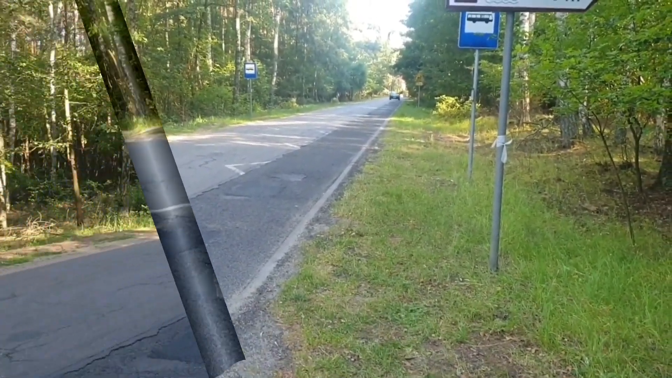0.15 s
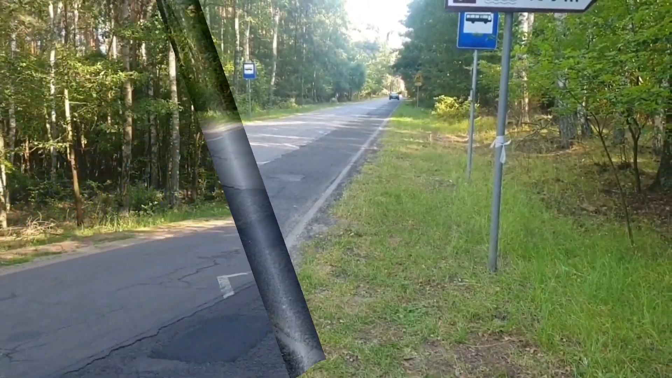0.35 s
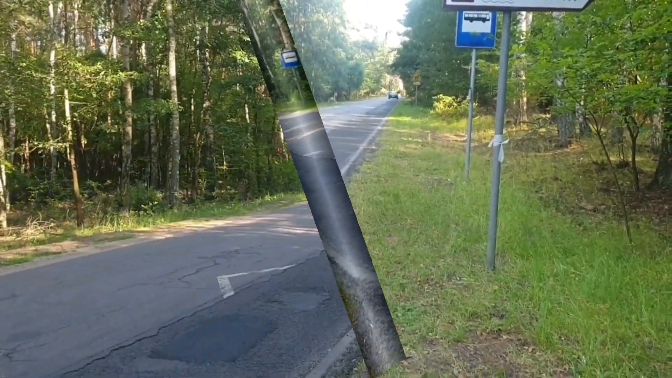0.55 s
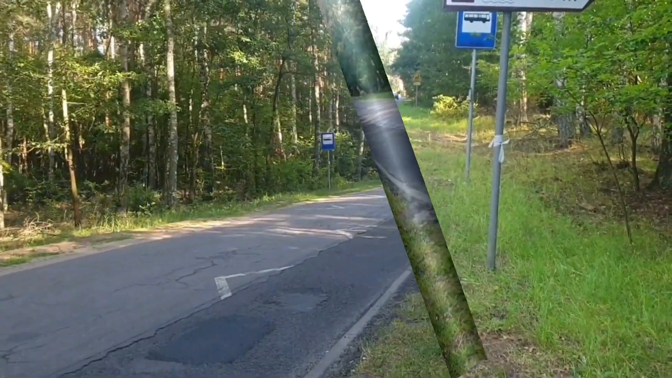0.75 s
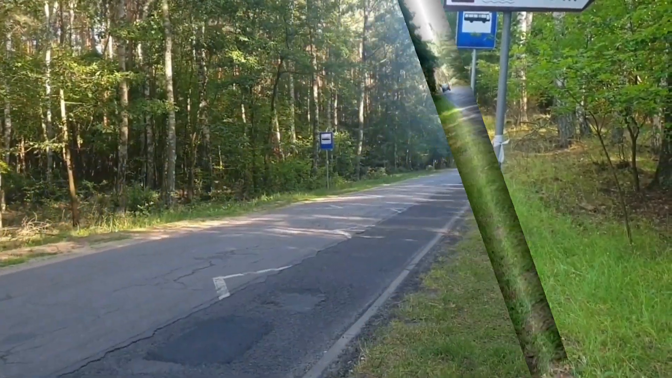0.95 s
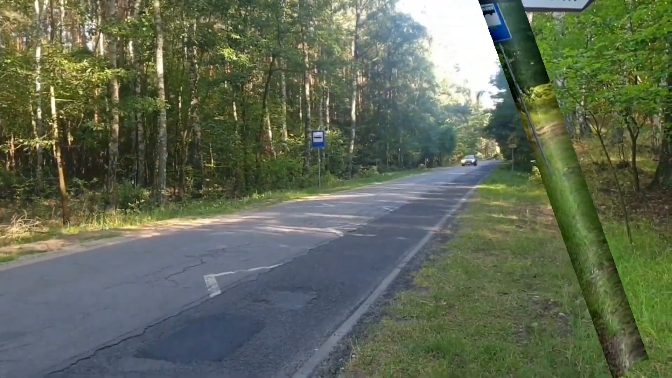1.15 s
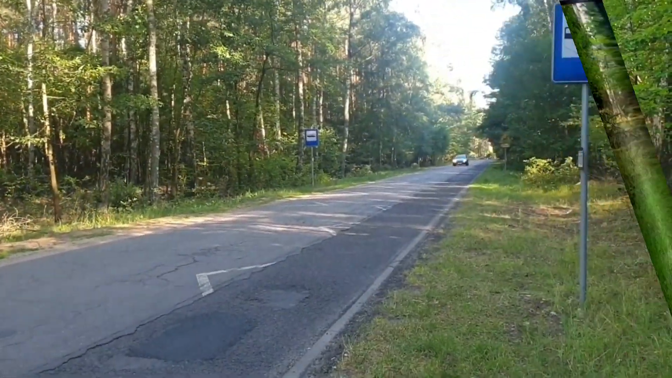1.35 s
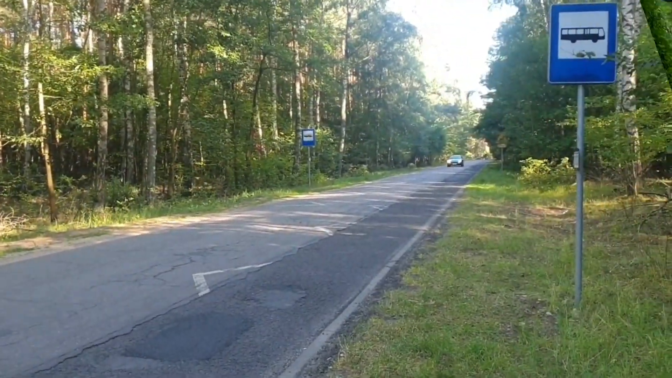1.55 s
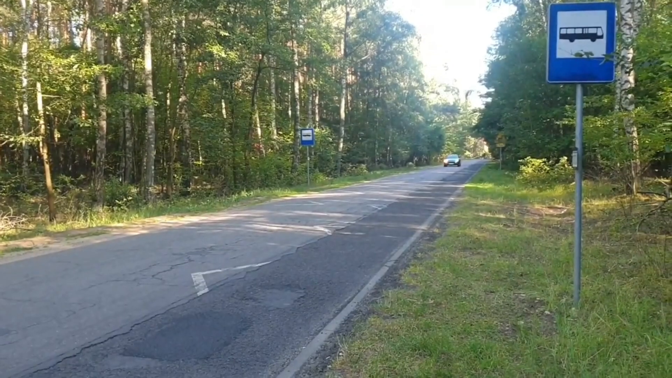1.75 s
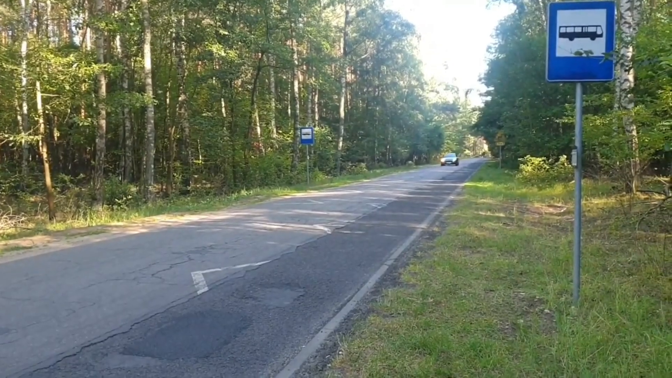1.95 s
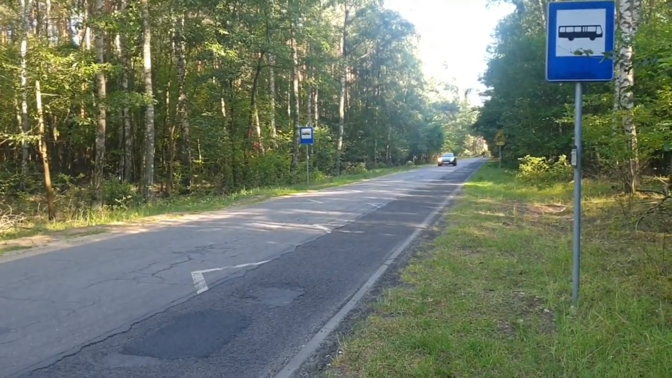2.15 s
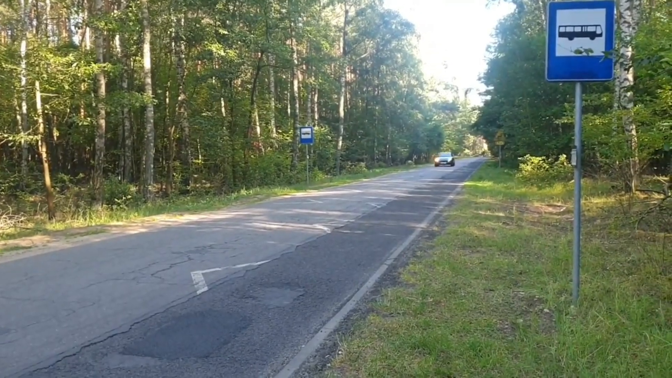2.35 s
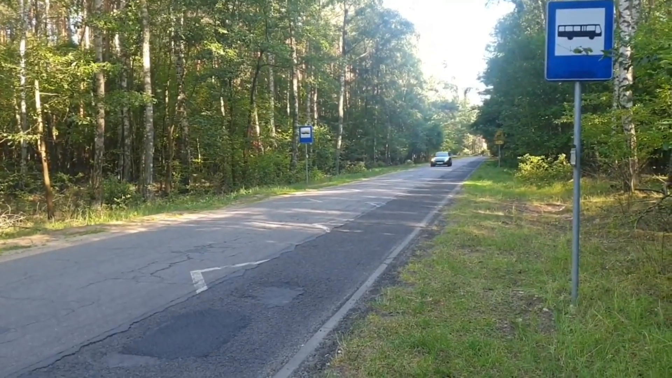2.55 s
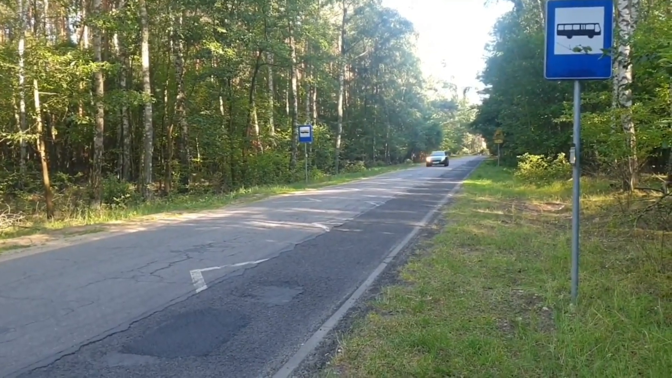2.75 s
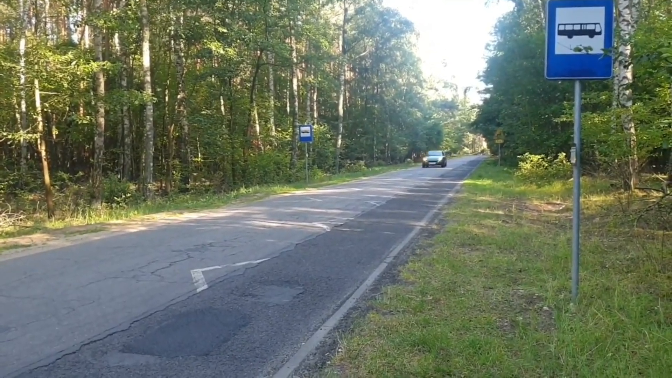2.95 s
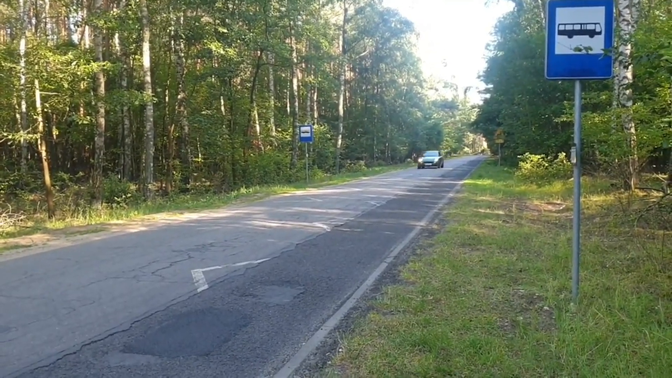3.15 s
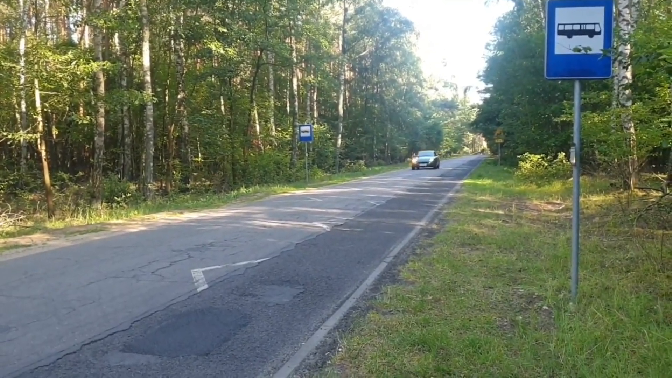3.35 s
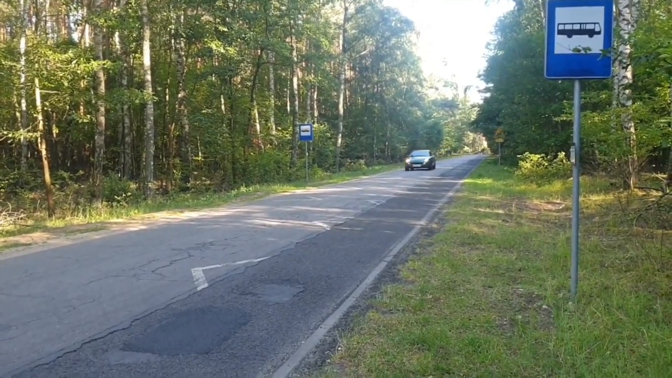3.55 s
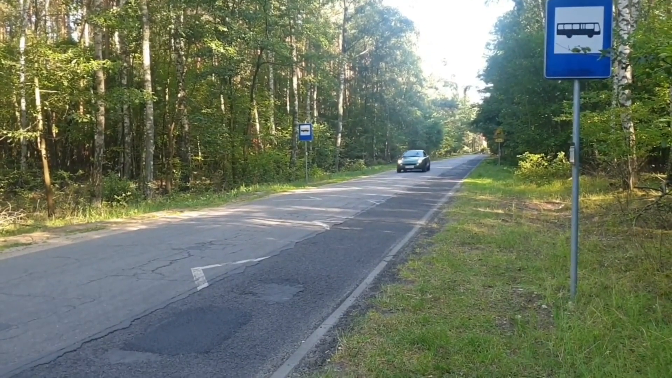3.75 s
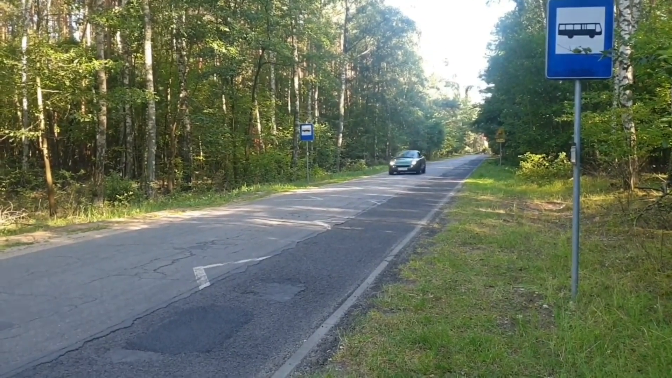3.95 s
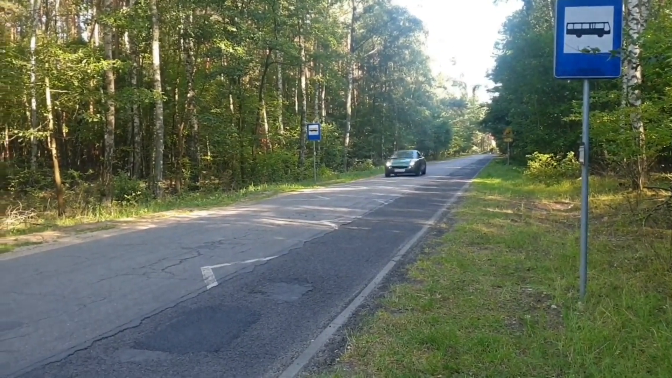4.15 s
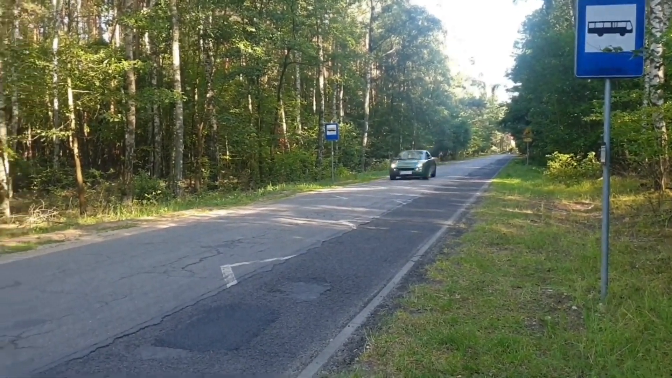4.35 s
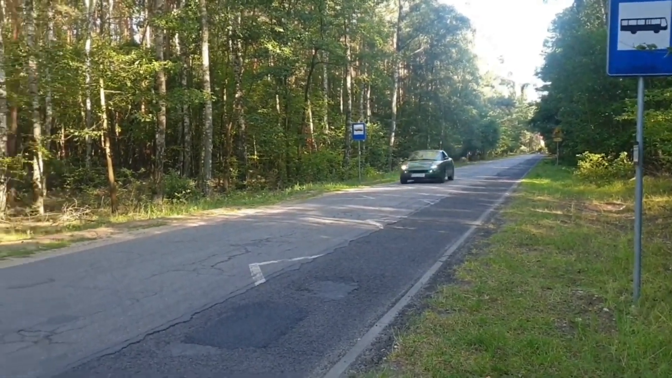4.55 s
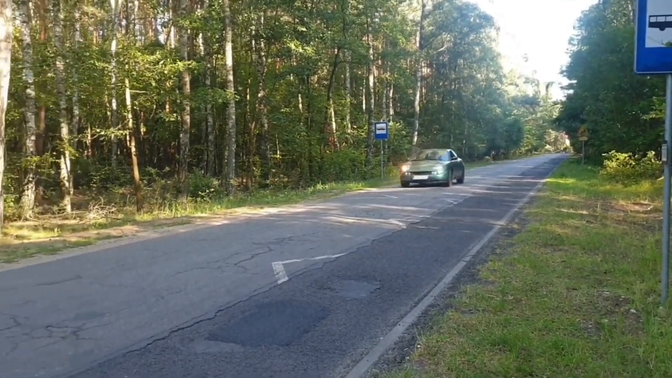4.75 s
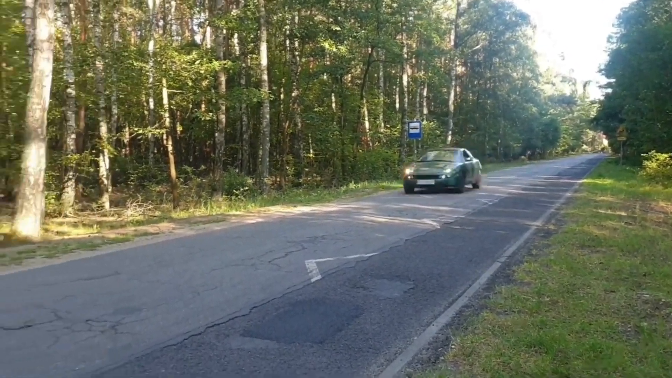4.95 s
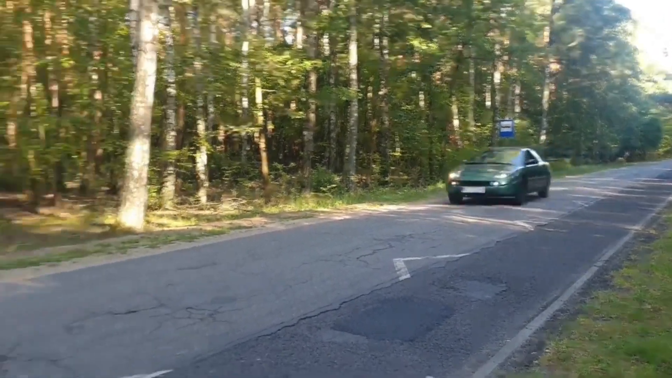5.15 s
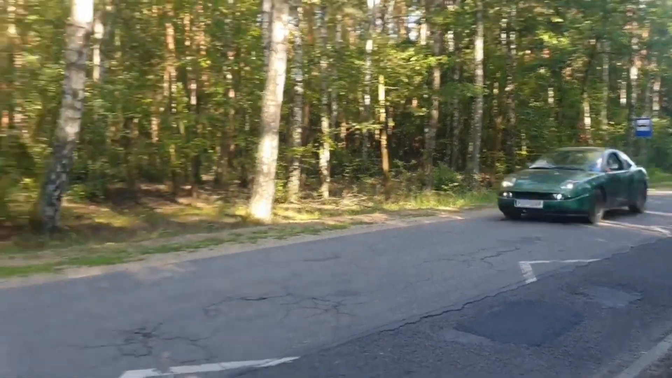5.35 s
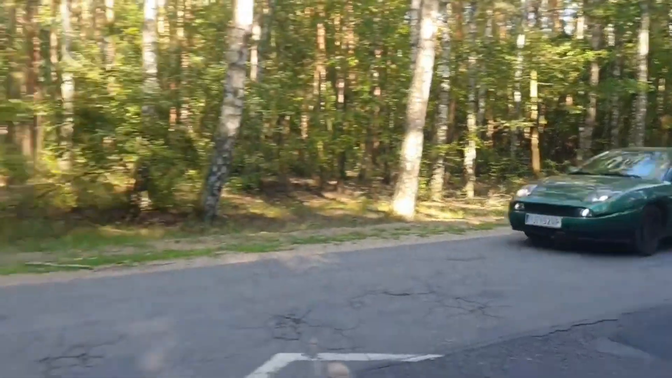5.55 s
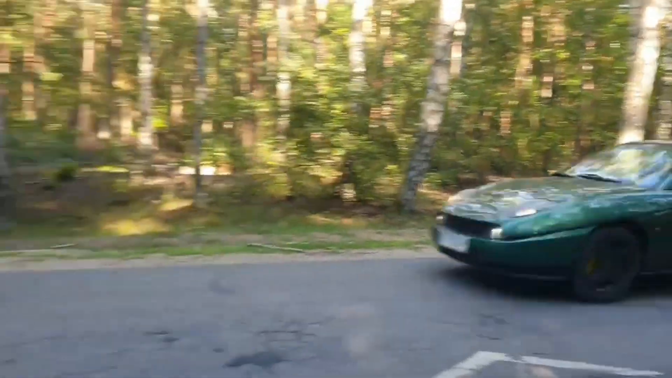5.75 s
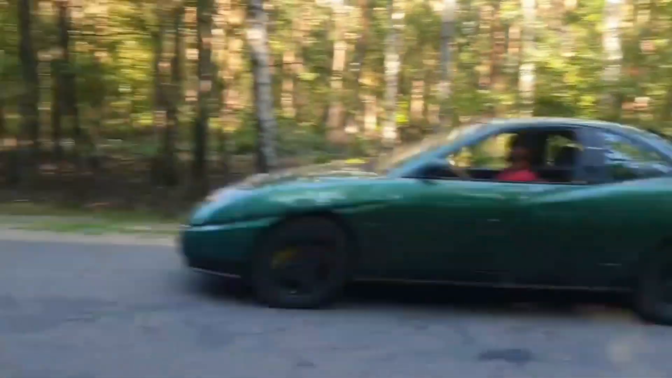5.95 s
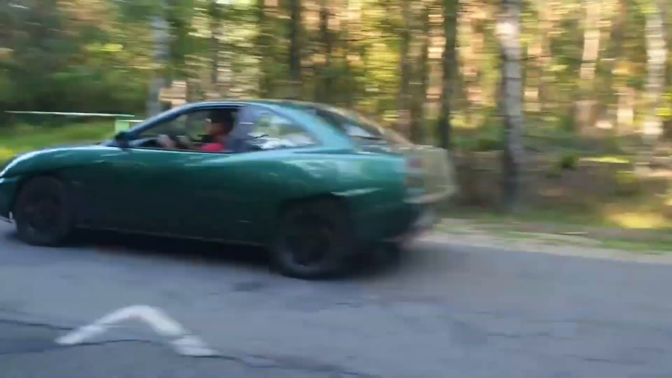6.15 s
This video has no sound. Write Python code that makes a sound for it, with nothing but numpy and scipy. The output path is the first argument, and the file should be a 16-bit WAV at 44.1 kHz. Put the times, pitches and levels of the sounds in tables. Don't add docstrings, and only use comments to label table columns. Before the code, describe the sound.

A receding car hums faintly and vanishes, followed by near silence and a short clicky glitch. Then low wind buffeting and a far car's steady drone appear, with tyre roar gradually brightening and a thin whine inside it. One tiny stone tick sounds. Late on, the engine accelerates hard, raspy and barking, loudest right beside the small stereo microphone at the end.

```python
import sys
import numpy as np
from scipy import signal
from scipy.io import wavfile
from scipy.ndimage import uniform_filter1d

SR = 44100
rng = np.random.default_rng(int(sys.argv[2]) if len(sys.argv) > 2 else 0)


def convert_level_to_amplitude(level_db):
    exponent = np.asarray(level_db, float) / 20
    return 10 ** exponent


def to_wav(sig):
    pcm = np.clip(np.atleast_2d(sig), -1, 1) * 32767
    pcm = np.round(pcm).astype(np.int16)
    wavfile.write(sys.argv[1], SR, pcm.T)


N = 273861
T = np.arange(N) / SR
FRAME_S = np.arange(N // 256 + 5) * 256 / SR
HZ = np.fft.rfftfreq(1024, 1 / SR)[:, None]
OPEN_S = 4.58


def read(points, hz=HZ):
    f, value = np.transpose(points)
    return np.interp(np.log(hz + 1), np.log(f + 1), value)


def curves(rows, t):
    s, *columns = np.transpose(rows)
    return [np.interp(t, s, c) for c in columns]


def bumps(rows, t):
    return sum(db * np.clip(1 - abs(t - s) / half, 0, 1) for s, db, half in rows)


def drift(rate_hz):
    f, phase = np.geomspace(rate_hz / 12, rate_hz, num=16), rng.random(16)
    coarse = np.sin(2 * np.pi * (f * FRAME_S[:, None] + phase)) @ f ** -.5
    return np.interp(T, FRAME_S, coarse / coarse.std())


def noise(shape_db, level_db, lo_hz, hi_hz, same, tilt_db, lag, patchy_db):
    a, b, c, d, patches = rng.standard_normal((len(level_db), 513, 5)).T
    patches = uniform_filter1d(uniform_filter1d(patches, size=10, axis=0), size=12, axis=1)
    shape = convert_level_to_amplitude(shape_db + 0 * level_db)
    band = (HZ[:, 0] > lo_hz) & (HZ[:, 0] < hi_hz)
    shape = shape / np.sqrt((shape[band] ** 2).sum(0))
    shape = shape * convert_level_to_amplitude(level_db + patchy_db * patches / patches.std())
    same = np.clip(same, 0, 1)
    right = a + 1j * b
    left = (same * right + np.sqrt(1 - same ** 2) * (c + 1j * d)) * np.exp(-1j * lag)
    z = np.array([left * convert_level_to_amplitude(tilt_db / 2), right * convert_level_to_amplitude(-tilt_db / 2)]) * shape
    sound = signal.istft(z, nperseg=1024, noverlap=768)[1][:, :N] * 0.9
    return np.pad(sound, ((0, 0), (0, N - sound.shape[1])))


def tone(turns, db, waver_db, lag_turns=0):
    size = np.sqrt(2) * convert_level_to_amplitude(db + waver_db * drift(14.))
    phase = turns + rng.random()
    return size * np.sin(2 * np.pi * np.array([phase - lag_turns, phase])) * convert_level_to_amplitude([[.6], [-.6]])


# frequency in Hz, level in dB.
LEAVING_COLOUR = [(88, -38), (150, -14), (166, -2.5), (255, -8), (283, -12), (405, -13.5), (581, -26.5),
                  (891, -12.5), (1300, -11), (1620, -21), (2100, -16.5), (2380, -24), (2600, -29),
                  (3000, -26), (3280, -32), (4770, -31.5), (6390, -51), (9000, -60), (11700, -98),
                  (19800, -120)]
# frequency in Hz, left over right in dB.
LEAVING_LEAN = [(60, 1.5), (120, 1.5), (240, 1.0), (470, 0.5), (940, 3.6), (1870, 9.1), (3730, 2.5),
                (7410, 3.5), (14800, 0.5)]
# frequency in Hz, likeness 0-1.
LEAVING_LIKENESS = [(60, 0.86), (150, 0.99), (380, 0.93), (940, 0.88), (2350, 0.32), (5890, 0.26),
                    (14800, 0.15)]
# time in seconds, change in dB, half length in seconds.
LEAVING_FLUTTER = [
    (.03, -1, 0.055),
    (.19, 1, 0.042),
    (.3, 7, .04),
    (.33, -4, 0.024),
    (.47, 6, 0.033),
]
# time in seconds, change in dB, half length in seconds.
LEAVING_AIR = [
    (.45, 11, .12),
]
# frequency in Hz, level in dB.
AIR_COLOUR = [(25, -36), (36, -14), (50, 3), (75, -8), (110, 0), (160, -24.5), (260, -26), (500, -78),
              (9000, -110)]
# frequency in Hz, level in dB.
HISS_COLOUR = [(6000, -20), (8500, -5), (10500, 0), (13500, -1), (14400, -1.5), (15300, -6)]


def leaving():
    tone_level_db, roar_level_db, faded_s = -47.5, -54.5, 0.75
    fade_db = 20 * np.log10(np.clip(1 - T / faded_s, .001, 1))
    first_db = tone_level_db + fade_db + bumps(LEAVING_FLUTTER, T)
    lower_db = -51 + fade_db - 8 * np.clip((T - .25) / .06, 0, 1)
    turns = 127 * T
    tones = tone(turns, first_db, 0.53)
    tones += tone(.75 * turns, lower_db, 3.5)
    tones += tone(1.96 * turns, tone_level_db + fade_db - 15.5, 1.4)

    frames = FRAME_S[:len(FRAME_S) // 8]
    frame_fade_db = np.interp(frames, T, fade_db)
    roar_db = roar_level_db + frame_fade_db
    duller = (HZ / 1000) ** 2 * frames * 0.86
    roar = noise(read(LEAVING_COLOUR) - duller, roar_db + 3.5, 700, 3000,
                 read(LEAVING_LIKENESS), read(LEAVING_LEAN), 0, 0.48)
    low_db = roar_db - 3 + bumps(LEAVING_AIR, frames)
    low = noise(read(AIR_COLOUR), low_db, 25, 95, .97, 0, 0, 1.1)
    hiss = noise(read(HISS_COLOUR), frame_fade_db - 94, 9000, 12800, .3, 0, 0, 2.)
    return tones + roar + low + hiss


# time in seconds, tyre roar in dB, left port lag in ms, nearness from 0 up,
# echo notch in Hz.
APPROACH = [(.7, -44, 0.0011, .01, 980), (1.3, -42, .001, 0.013, 934), (2.4, -39, .0012, 0.15, 910),
            (3, -36.5, .001, 0.098, 868), (4, -34, 0.00091, 0.4, 945), (4.7, -31.5, 0.003, 0.58, 980),
            (5, -31.5, 0.01, 0.66, 970), (5.2, -32, 0.0087, 0.84, 1010), (5.4, -30, 0.08, 0.73, 1053),
            (5.8, -28, 0.12, 0.82, 1097), (5.93, -29, 0.11, 1.2, 1100), (6, -25.5, 0.088, 1.75, 1160),
            (6.13, -25.5, 0.18, 1.8, 1260), (6.21, -27, 0.14, 2.6, 1260)]
# frequency in Hz, level in dB per Hz.
FAR_COLOUR = [(200, -61), (340, -9.5), (599, -5), (632, -16), (704, 0.5), (753, -1.5), (897, -3.5),
              (1040, 1), (1500, -1), (1670, -1), (2000, -4), (2330, -4.5), (2750, -8), (3100, -12.5),
              (3940, -14), (4890, -25), (8500, -42), (11000, -41.5), (18700, -120)]
NEAR_COLOUR = [(250, -20.5), (420, 2.5), (477, -7.5), (617, -7), (954, -5), (1070, -5), (1250, -9),
               (1740, -9.5), (2220, -13), (3270, -19.5), (4060, -19), (4620, -25), (9000, -43),
               (11700, -41.5), (19800, -120)]
ABREAST_COLOUR = [(250, -27), (420, -22), (484, -20), (711, -7.5), (872, -14), (954, -9.5), (1310, -14),
                  (1550, -10), (1860, -17.5), (2310, -10), (2660, -16), (2950, -12), (3300, -17),
                  (3620, -15.5), (4300, -21.5), (4800, -28.5), (6500, -33.5), (9000, -41), (11700, -54),
                  (19800, -120)]
# frequency in Hz, level in dB.
RUMBLE_COLOUR = [(30, -17.5), (48, 5), (70, -10), (110, 13), (200, 7), (290, 12), (350, -60), (700, -33.5),
                 (7000, -39), (9500, -87)]
# frequency in Hz, likeness 0-1.
PORT_LIKENESS = [(100, .99), (500, .96), (1000, .88), (1500, .8), (2300, .87), (3300, .55), (4300, .7),
                 (6000, .5), (10000, .25)]
# frequency in Hz, lag in radians.
PORT_LAG = [(100, .05), (700, 0.53), (1500, 0.92), (2500, 0.54), (3600, 1.28), (4200, 0.29), (6000, 1.07),
            (9000, 2)]
# frequency in Hz, left over right in dB.
LEAN_FAR = [(100, -2), (700, 2), (1200, -0.5), (1900, -4.5), (2600, -3), (3300, 2.5), (3900, -11.5),
            (4400, -1), (5200, 3.5), (6500, 7), (9000, 8)]
LEAN_NEAR = [(100, 16), (700, -1), (1200, 2), (1900, -11), (2300, -7.5), (3200, -3.5), (3900, 0),
             (4800, -2), (6500, 6), (9000, 7)]
# frequency when far in Hz, readiness to slide 0-1, share of the depth.
ECHO_NOTCHES = [(414, 1, .8), (920, 1, 1), (1518, 1, 1), (2500, .2, .7), (3150, .22, .7)]
# time in seconds, centre in Hz, half width in Hz, depth in dB.
HISS_VALLEY = [(.7, 11000, 1200, 3), (2, 10600, 1000, 7), (2.78, 10000, 600, 4), (3, 10800, 1100, 9),
               (3.4, 10600, 1200, 4), (3.7, 10900, 1100, 14), (4, 11000, 1100, 20), (4.2, 11700, 700, 20),
               (4.6, 11700, 400, 18), (4.8, 11400, 300, 12), (5.05, 11000, 550, 21), (5.2, 11500, 400, 18),
               (5.25, 11500, 400, 0), (5.35, 9500, 700, 0), (5.44, 9500, 800, 9), (5.48, 9500, 700, 2),
               (5.54, 9600, 700, 14), (5.62, 9700, 400, 3), (5.77, 9500, 800, 12), (5.85, 9900, 400, 10),
               (5.95, 9000, 400, 9), (6.02, 9000, 400, 2), (6.12, 9400, 400, 10), (6.21, 9300, 500, 2)]
# time in seconds, change in dB, half length in seconds.
LEAF_RUSTLE = [
    (2.78, 11, 0.074),
]


def road():
    roar_db, lag_ms, near, notch_hz = curves(APPROACH, FRAME_S)
    first, second = np.clip(near, 0, 1), np.clip(near - 1, 0, 1)
    colour = (1 - first) * read(FAR_COLOUR) + (first - second) * read(NEAR_COLOUR)
    colour = colour + second * read(ABREAST_COLOUR)
    depth_db = np.interp(near, [0, 1, 2], [5, 14, 5])
    width_hz = 36 + near / 60 * np.array([[f] for f, _, _ in ECHO_NOTCHES])
    for (f, slide, share), width in zip(ECHO_NOTCHES, width_hz * 0 + 1):
        centre_hz = f * (notch_hz / 920) ** slide
        width = 36 + f / 60 * near
        colour = colour - 1.4 * share * depth_db / (1 + ((HZ - centre_hz) / width) ** 2)
    valley_hz, valley_width, valley_depth_db = curves(HISS_VALLEY, FRAME_S)
    valley_db = valley_depth_db * np.exp(-((HZ - valley_hz) / valley_width) ** 4)
    colour = colour - valley_db

    turned = np.clip(lag_ms / 0.21, 0, 1)
    lean = (1 - turned) * read(LEAN_FAR) + turned * read(LEAN_NEAR)
    same = read(PORT_LIKENESS) ** (1 + 1.6 * turned * np.clip(HZ / 1200, 0, 1) ** 2)
    lag = read(PORT_LAG) + 2 * np.pi * HZ * lag_ms / 1000
    roar = noise(colour, roar_db + 3.5, 500, 4500, same, lean, lag, 0.93)

    rumble_db = roar_db - 9 + 4.5 * np.clip(FRAME_S - OPEN_S, 0, None)
    rumble_colour = read(RUMBLE_COLOUR) - 5.2 * near * (HZ < 110)
    rumble = noise(rumble_colour, rumble_db - 3.5, 180, 225, 0.93, 1.3, lag, 3.5)

    heard = np.clip((FRAME_S - 4.13) / 1.0 + .5, 0, 1)
    near_hiss_db = roar_db - 27.5 + 6.5 * (FRAME_S - OPEN_S)
    hiss_db = heard * near_hiss_db + (1 - heard) * -71.5 + bumps(LEAF_RUSTLE, FRAME_S)
    hiss_db = hiss_db - 8 * (1 - first)
    top_loss = np.clip((HZ - 13900) / 600, 0, 1) * np.clip(1.6 - abs(FRAME_S - 4.3) / .4, 0, 1)
    hiss_colour = read(HISS_COLOUR) - valley_db - 9 * top_loss
    hiss = noise(hiss_colour, hiss_db + 0.33, 9000, 12800, 0.15, .3, 0, .7)
    return roar + rumble + hiss


# time in seconds, level in dB.
EXHAUST_LEVEL = [(.72, -36), (1.3, -37.5), (2.1, -41), (2.5, -31), (3.2, -31.5), (3.75, -34.5), (4.1, -27),
                 (4.35, -28), (4.74, -29), (4.97, -19.5), (5.11, -16), (5.3, -14.5), (5.8, -14.5),
                 (6.21, -12)]
# time in seconds, change in dB, half length in
# seconds.
FIRING_FLUTTER = [(.76, -24, 0.11), (1.42, 3, 0.059), (1.47, -8, .03), (1.52, 4.5, 0.054),
                  (1.72, -9, 0.024), (1.85, 6, 0.16), (1.91, -18, 0.043), (2.1, 1, .05), (2.37, 8.5, 0.02),
                  (2.43, -17, .05), (2.52, 2.5, 0.054), (2.64, -15, 0.027), (2.72, 7, 0.14),
                  (2.86, -9, 0.45), (3.31, -4, .03), (3.1, 2, 0.15), (3.77, 7, 0.075), (3.9, 2, 0.054),
                  (4.22, -3, .08), (4.31, 4, 0.021), (4.54, 1, .04), (4.63, 2, 0.055), (5.14, -2, .04),
                  (5.41, -2, .05), (5.86, 3.5, 0.065), (6.1, -2, 0.066), (6.16, 1.5, 0.044)]
OCTAVE_FLUTTER = [(.8, 4, 0.28), (1.48, -1.5, .08), (1.88, 1.5, 0.072), (2.05, -3, 0.14),
                  (2.36, 1.5, 0.072), (2.71, -3.5, .05), (4.16, 0, 0.073), (4.27, -3, 0.05),
                  (4.6, -3, 0.13), (5.11, -3.5, 0.47), (5.52, 1, 0.09), (5.98, 1.5, 0.085),
                  (6.07, -7, 0.046)]
# time in seconds, change in dB, half length in seconds.
BARKS = [
    (5.2, 3, .4),
    (5.78, 2.5, .08),
    (6.17, 2.5, .06),
]


def exhaust_levels():
    roar_db = curves(APPROACH, FRAME_S)[0]
    since = np.clip(FRAME_S - OPEN_S, 0, None)
    opened = np.clip(since / 0.36, 0, 1)
    first_db = curves(EXHAUST_LEVEL, FRAME_S)[0] + bumps(FIRING_FLUTTER, FRAME_S)
    second_db = np.minimum(roar_db, -29.) - 2 + 11 * opened + bumps(OCTAVE_FLUTTER, FRAME_S)
    growl_db = np.minimum(roar_db - 19 + 26 * opened, -39) + bumps(BARKS, FRAME_S)
    quarter_db = roar_db - 17 + 10 * since
    return [np.interp(T, FRAME_S, db) for db in (first_db, second_db, quarter_db, growl_db)]


# time in seconds, frequency in Hz, level in dB.
WHINE_PATH = [(1, 1600, -77), (2.5, 1584, -48.5), (4.4, 1612, -44), (5, 1596, -46), (5.4, 1720, -55)]


def whine():
    hz, db = curves(WHINE_PATH, T)
    return tone(np.cumsum(hz) / SR, db, 1.3, 0.28) * convert_level_to_amplitude([[-5.5], [1.5]])


def growl(turns, growl_db):
    firing = np.floor(turns + .018 * drift(40.))
    cylinder = np.array([1, .12, .04, .15])[firing.astype(int) % 4]
    pulses = (np.diff(firing, prepend=0) > 0) * cylinder * convert_level_to_amplitude(1.4 * rng.standard_normal(N))
    t = T[:600]
    ring = np.sin(2 * np.pi * 645 * t) * np.exp(-t / .0025) * (1 - np.exp(-t / .003))
    sound = signal.oaconvolve(pulses, ring)[:N]
    sound = convert_level_to_amplitude(growl_db) * sound / sound.std()
    return np.array([np.roll(sound, 4), sound])


# time in seconds, rate in Hz.
FIRING_RATE = [(.72, 123), (1.5, 124.5), (2, 125.5), (3, 127.1), (4, 128.4), (4.7, 129.1), (4.88, 131.8),
               (5, 131.6), (5.15, 134.3), (5.3, 138), (5.6, 145.7), (5.9, 154.2), (6, 157.2), (6.1, 159.2),
               (6.21, 161.6)]
QUARTER_ORDERS = [2, 3, 5, 6, 7, 9, 10, 11, 12, 13, 14]
QUARTER_LEVELS = [-13, -1, 1, -7, 1.5, -4, -15, -17, -29, -28, -31]
# multiple of the firing rate, level in dB.
CRUISE_TONES = [(2.25, -57), (5, -53.5), (6, -50), (7, -58)]


def engine():
    first_db, second_db, quarter_db, growl_db = exhaust_levels()
    hz = curves(FIRING_RATE, T)[0] * (1 + 0.0022 * drift(9.))
    turns = np.cumsum(hz) / SR
    late = hz * (curves(APPROACH, T)[1] + 0.14) / 1000
    calm = np.clip((5.1 - T) / .5, .25, 1)
    out = tone(turns, first_db, 1.9 * calm, late)

    octave_turns = 2 * turns + .013 * (hz - 136)
    out += tone(octave_turns, second_db, 1.06 * calm, 2 * late) * convert_level_to_amplitude([[0.65], [-0.65]])
    for k, db in zip(QUARTER_ORDERS, QUARTER_LEVELS):
        out += tone(k / 4 * turns, db + quarter_db, 1 + 2 * calm, k / 4 * late)
    cruise_db = np.clip(1.3 * (quarter_db + 53), -11, 3) - 13 * np.clip((T - OPEN_S) / .3, 0, 1)
    for k, db in CRUISE_TONES:
        out += tone(k * turns, db + cruise_db, 3, k * late)

    pipe_hz, pipe_width_hz = 429, 11
    pipe_db = -39 - 20 * ((3 * hz - pipe_hz) / pipe_width_hz / 2) ** 4
    out += np.sqrt(2) * convert_level_to_amplitude(pipe_db) * np.sin(2 * np.pi * 3 * turns)
    return out + growl(turns, growl_db) + whine()


# time in seconds, peak in dB, frequency in Hz, port (+1 left, -1 right).
EDDIES = [(0.739, -22, 72, -1), (0.778, -29, 68, -1), (0.817, -21, 77, -1), (0.887, -26, 65, -1),
          (0.988, -37, 72, -1), (1.072, -30, 64, -1), (1.128, -36, 85, -1), (1.16, -23, 71, 1),
          (1.177, -30, 79, -1), (1.196, -36, 71, 1), (1.304, -31, 71, -1), (1.346, -33, 64, -1),
          (1.403, -37, 70, -1), (1.494, -35, 72, -1), (1.551, -30, 70, 1), (1.593, -26, 59, 1),
          (1.594, -36, 68, -1), (1.734, -32, 76, -1), (1.834, -31, 80, -1), (2.176, -25, 68, 1),
          (2.211, -31, 78, 1), (2.259, -27, 63, 1), (2.421, -30, 67, 1), (2.499, -30, 79, 1),
          (2.594, -28, 60, 1), (2.636, -30, 74, 1), (2.68, -21, 52, 1), (2.783, -29, 69, 1),
          (2.836, -28, 80, 1), (2.926, -25, 65, 1), (2.975, -33, 74, 1), (3.069, -29, 73, 1),
          (3.172, -33, 72, 1), (3.39, -23, 73, 1), (3.54, -28, 59, 1), (3.682, -28, 62, 1),
          (3.838, -28, 73, 1), (3.919, -29, 67, 1), (4.084, -31, 58, 1), (4.202, -31, 75, 1),
          (4.325, -29, 63, 1), (4.375, -30, 64, -1), (4.375, -29, 63, 1), (4.618, -25, 76, 1),
          (4.776, -26, 81, 1), (4.778, -29, 83, -1)]


def thumps():
    spread_s, leak_db = .011, -20
    t, out = np.arange(-2000, 2000) / SR, np.zeros((2, N))
    for (s, db, hz, port), turn in zip(EDDIES, rng.random(len(EDDIES))):
        slap = convert_level_to_amplitude(db) * np.exp(-.5 * (t / spread_s) ** 2) * np.cos(2 * np.pi * (hz * t + turn))
        ports = convert_level_to_amplitude([[leak_db * (port < 0)], [leak_db * (port > 0)]])
        out[:, round((s - .008) * SR) - 2000:][:, :4000] += slap * ports
    return out


# time in seconds, peak in dB, left over right in dB.
WIND_GUSTS = [(.74, -25.5, -7), (.88, -34, -12), (1.03, -49, -8), (1.13, -33, 22), (1.3, -48, -14),
              (1.58, -41, 23), (1.84, -45, -17), (2.17, -46, 20), (2.27, -40, 12), (2.42, -40, 21),
              (2.69, -33, 1), (2.9, -34.5, 22), (3.07, -39, 5), (3.18, -47, -5), (3.38, -36, 10),
              (3.65, -36, 8), (3.76, -46, -8), (3.84, -47, 21), (3.93, -44, 23), (4.1, -37, 17),
              (4.21, -45, -6), (4.37, -33, 0), (4.62, -42, 14), (4.8, -34, 0), (4.95, -38, 20),
              (5.2, -37, -4), (5.44, -52, -8), (5.6, -55, -4), (5.79, -50, -5)]


def wind():
    s, peak_db, pan_db = np.transpose(WIND_GUSTS)[:, :, None]
    power = convert_level_to_amplitude(peak_db - 130 * abs(FRAME_S - s)) ** 2
    total = power.sum(0) + convert_level_to_amplitude(-43) ** 2
    pan = (power * pan_db).sum(0) / total
    buffeting = noise(read(AIR_COLOUR), 10 * np.log10(total) + 0.5, 25, 95, .35, pan, 0, .8)
    return buffeting + thumps()


# time in seconds, peak in dB.
STONES = [
    (3.672, -16),
]


def grit():
    t, out = T[:130], np.zeros(N)
    for s, db in STONES:
        envelope = t / .00012 * np.exp(-t / .00012)
        out[round(s * SR):][:130] = convert_level_to_amplitude(db) * np.sin(2 * np.pi * 3200 * t) * envelope
    return out


def microphone(x):
    return signal.sosfilt(signal.butter(4, 42., "high", fs=SR, output="sos"), x)


def scene():
    cut, blip_on, blip_off = 30433, 31133, 31797
    n, tyres = np.arange(N), road()
    second = microphone(engine() + tyres + wind())
    since = np.clip(T - blip_on / SR, 0, 1)
    swing = .031 * np.cos(2 * np.pi * 136 * since) * (1 - (since / .0205) ** 3)
    blip = (swing + 0.93 * tyres) * (n >= blip_on) * (n < blip_off)
    lead_in = convert_level_to_amplitude(-30.) * tyres * (n < blip_on) * (n > blip_on - 150)
    fade = np.clip((n - blip_off) / SR / .011, .2, 1) ** 2 * (n >= blip_off)
    return microphone(leaving()) * (n < cut) + lead_in + blip + fade * second + grit()


def thinned(x):
    pair = np.array([[1, 0.9], [1, -1.016]]) / np.sqrt(2)
    hz, _, z = signal.stft(pair @ x[:, 642:], SR, "cosine", nperseg=2048, noverlap=1024)
    top = (hz > 8000) & (hz < 15200)
    power = abs(z[:, top]) ** 2
    mean = uniform_filter1d(power.mean((0, 1)), size=5) + 1e-30
    ragged = rng.standard_normal((power.shape[1] // 16 + 1, power.shape[2]))
    ragged = np.repeat(ragged, 16, 0)[:power.shape[1]]
    quiet_db = np.interp(10 * np.log10(mean), [-106, -80], [5.8, -.5])
    colour_db = np.interp(hz[top], [8000, 8900, 10200, 14000, 15000], [-3, 4.5, 0, 0, -2])
    threshold_db = quiet_db + 2.6 * ragged + colour_db[:, None] * (mean < 1e-9)
    keep = power > mean * convert_level_to_amplitude(threshold_db) ** 2
    before = uniform_filter1d(power.sum((0, 1)), size=5)
    after = uniform_filter1d((power * keep).sum((0, 1)), size=5) + 1e-30
    z[:, top] *= keep * np.clip(np.sqrt(before / after), 1, 4)
    back = pair @ signal.istft(z, SR, "cosine", nperseg=2048, noverlap=1024)[1]
    return np.concatenate([x[:, :642], back[:, :N - 642]], 1)


def roll_off(x):
    return signal.sosfilt(signal.butter(12, 15160, fs=SR, output="sos"), x)


def record(dry):
    floor = convert_level_to_amplitude(-106.0) * rng.standard_normal(dry.shape)
    return roll_off(thinned(dry) + floor)


dry = scene()
out = record(dry)
to_wav(out)
```